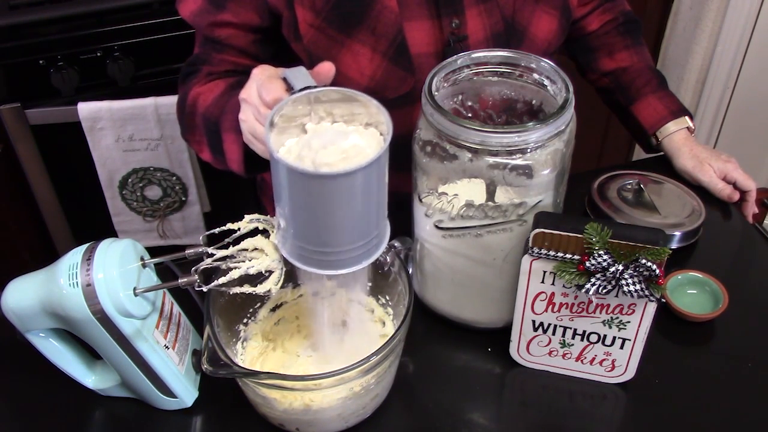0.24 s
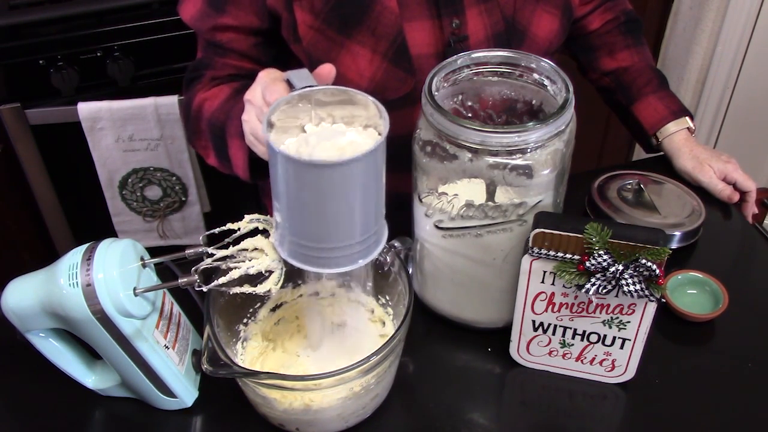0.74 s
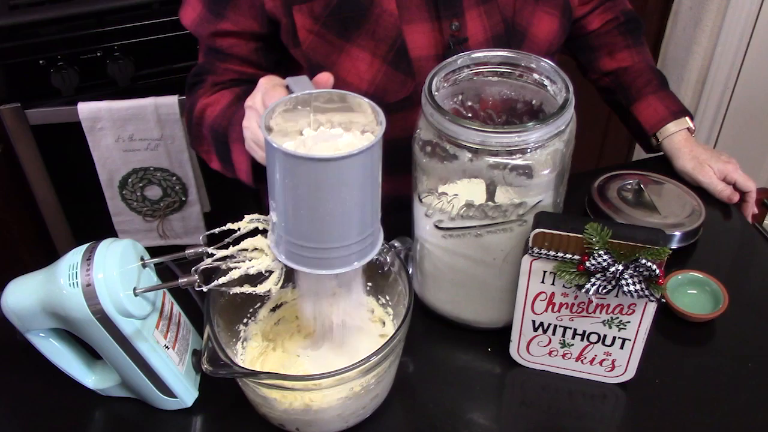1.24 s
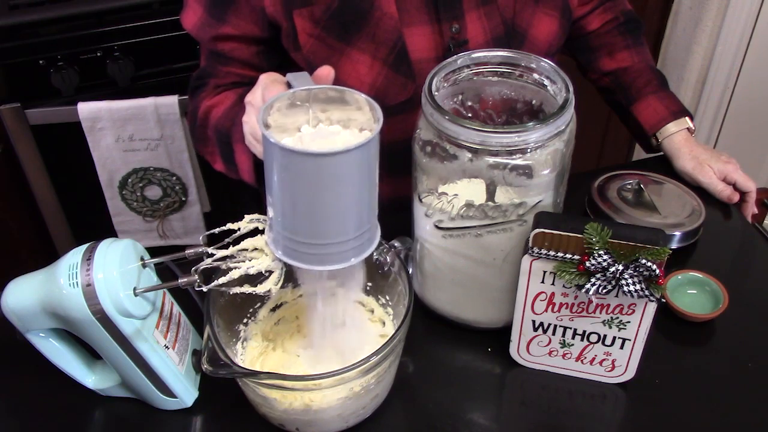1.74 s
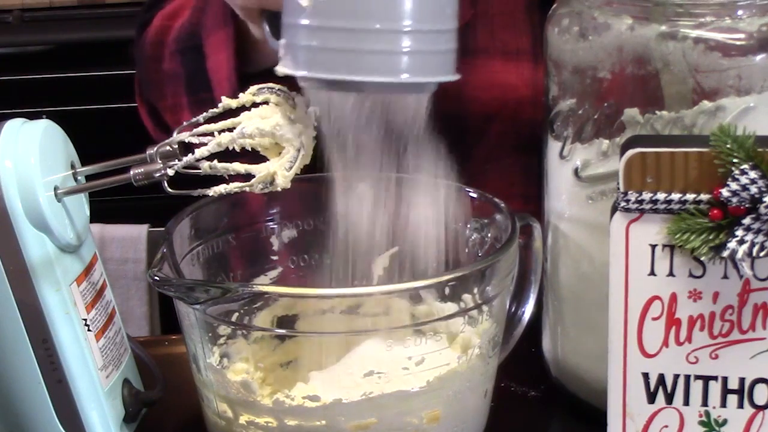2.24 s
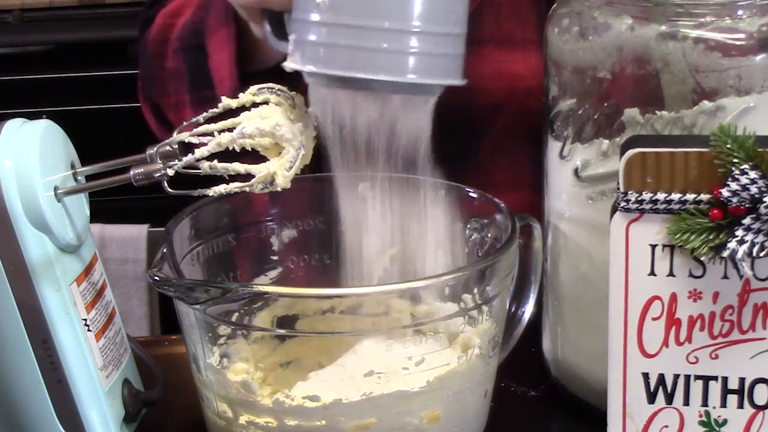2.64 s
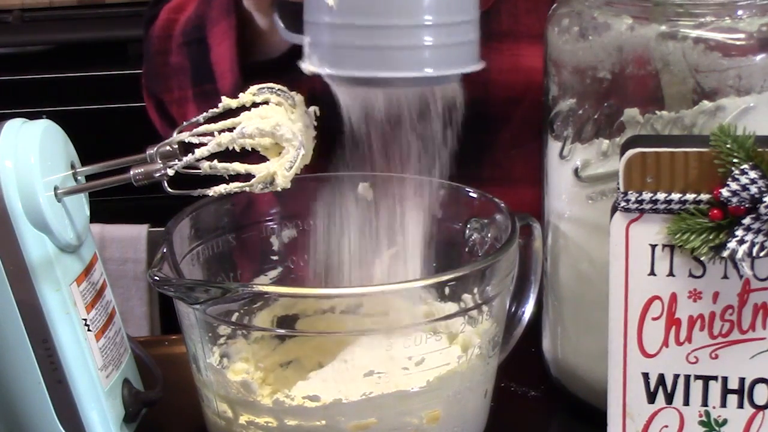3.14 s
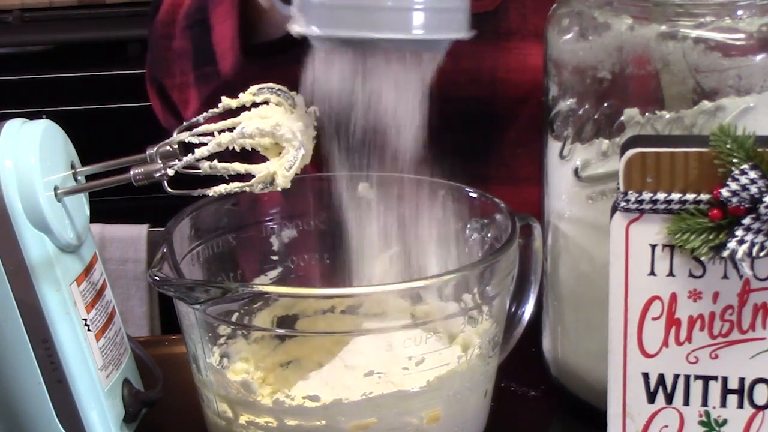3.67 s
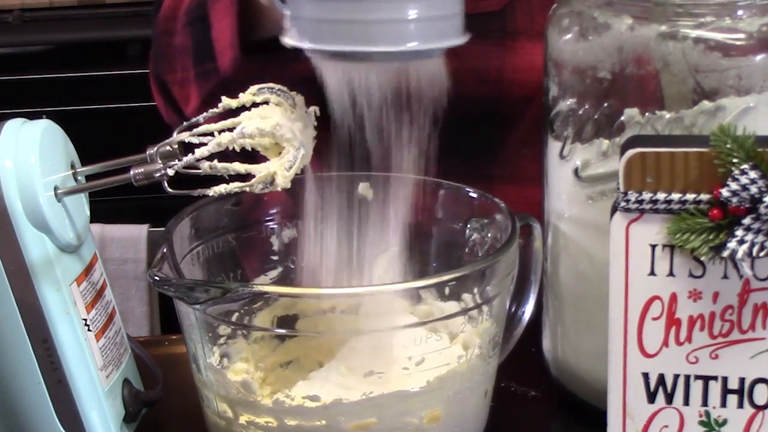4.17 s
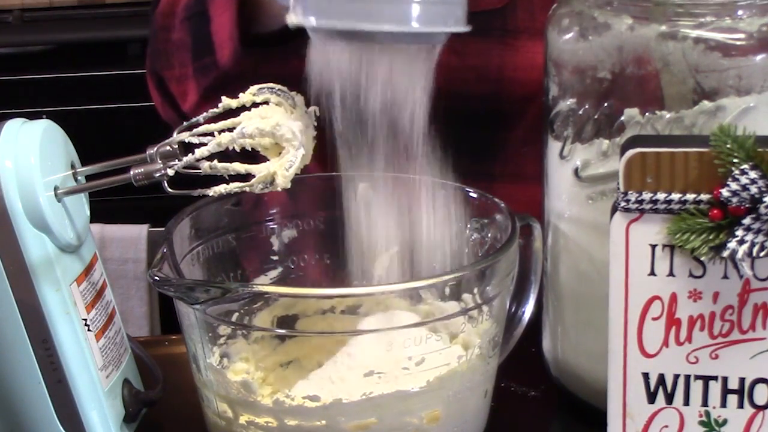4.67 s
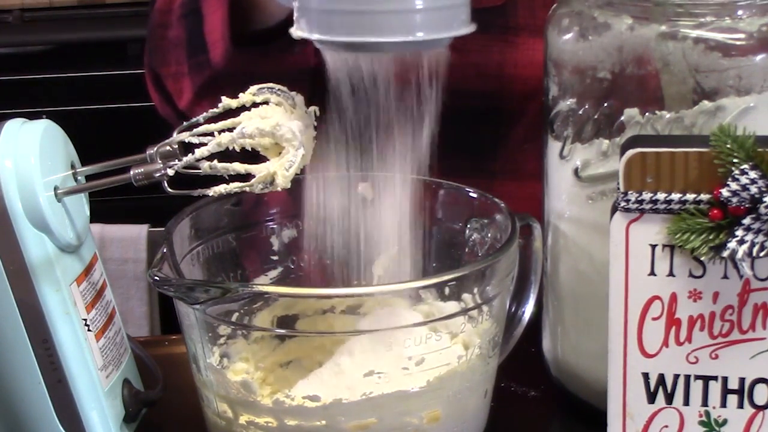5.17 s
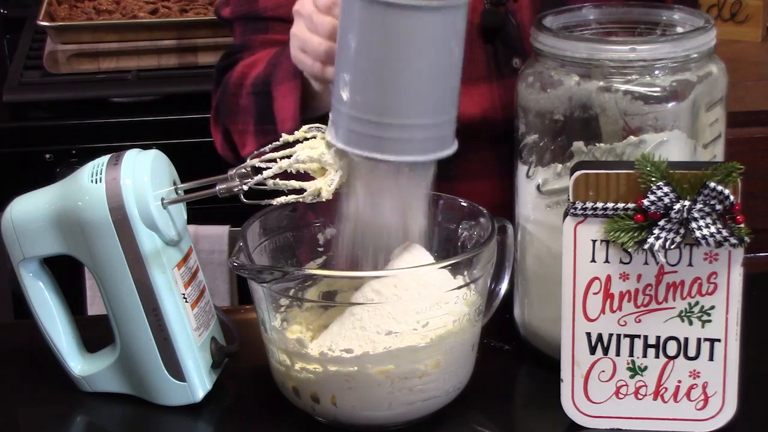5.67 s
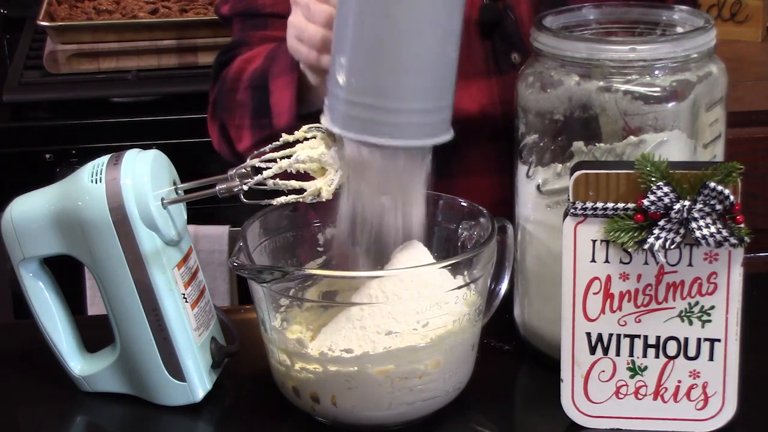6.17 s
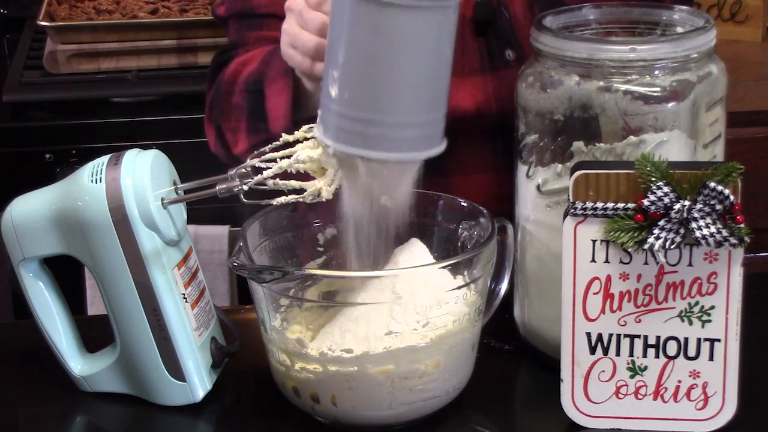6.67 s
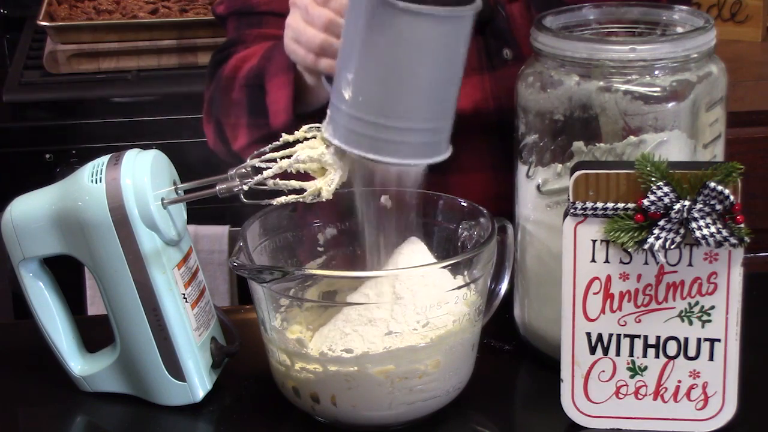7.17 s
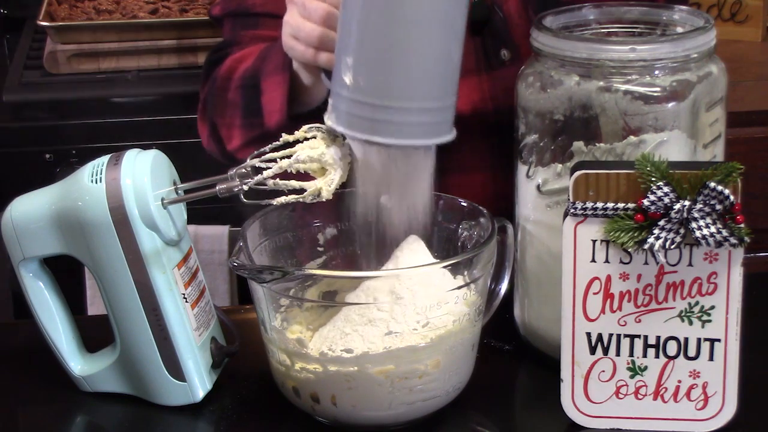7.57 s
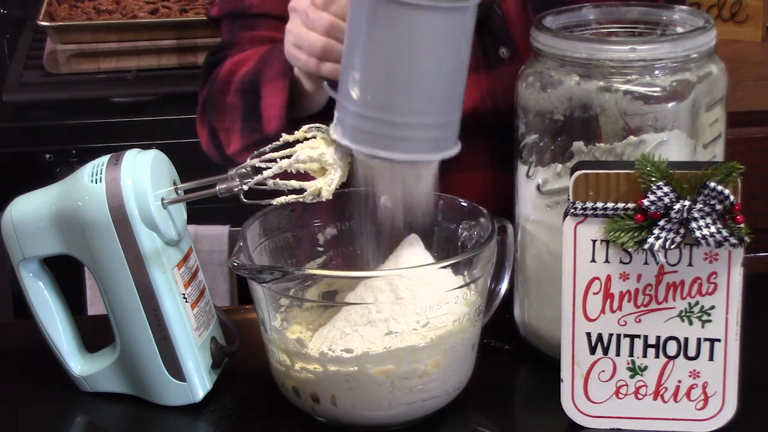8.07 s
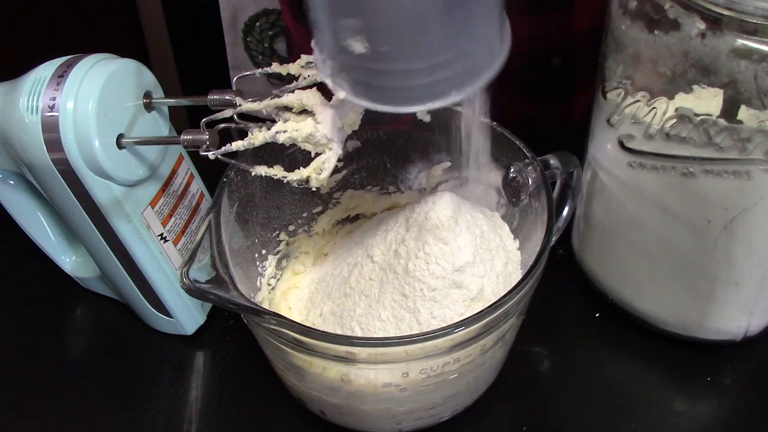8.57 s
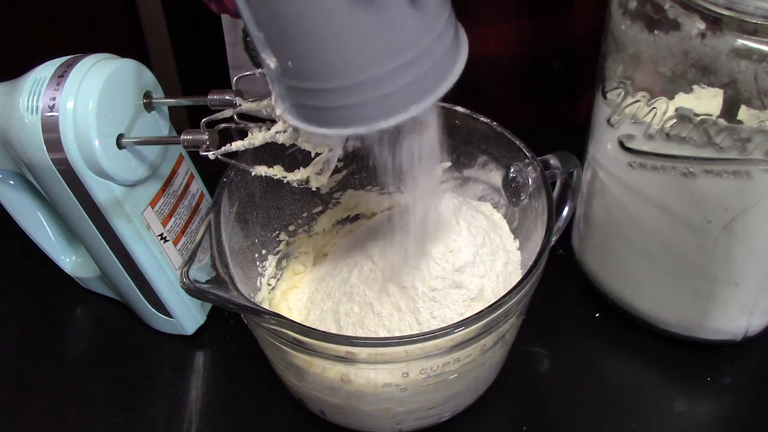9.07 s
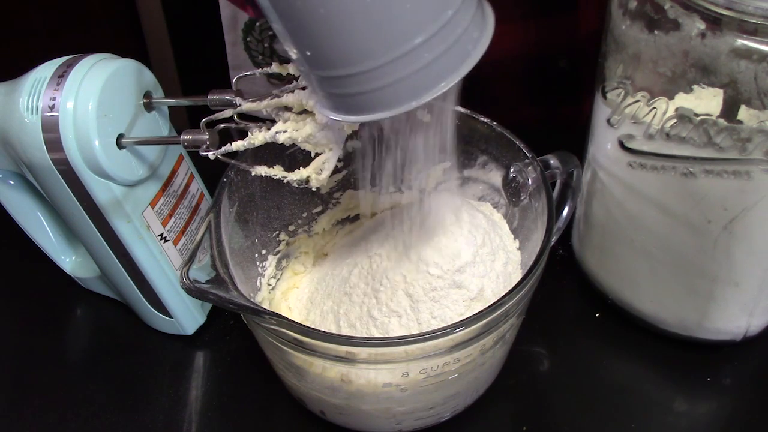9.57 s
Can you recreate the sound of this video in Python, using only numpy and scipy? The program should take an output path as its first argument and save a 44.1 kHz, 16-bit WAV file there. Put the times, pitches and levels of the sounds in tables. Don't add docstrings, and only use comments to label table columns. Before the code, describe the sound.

Quick metallic tick-scrape-snap cycles of a hand flour sifter give way to fast tinny cup slaps, then return crisper, over soft room rumble and hiss.

```python
import sys
import numpy as np
from scipy import signal
from scipy.fft import rfft, irfft
from scipy.io import wavfile

SR = 44100
rng = np.random.default_rng(int(sys.argv[2]) if len(sys.argv) > 2 else 0)


def ratio(d):
    e = np.asarray(d, float) / 20
    return 10 ** e


def store_wav(level_fs):
    pcm = np.round(np.clip(np.atleast_2d(level_fs), -1, 1) * 32767)
    wavfile.write(sys.argv[1], SR, pcm.T.astype(np.int16))


N = 433062

# (f/Hz, level/dB per Hz)
RUMBLE_COLOUR = [(20, 3), (60, 8), (150, 0), (300, -3.5), (500, -3.5), (750, -8.5), (1300, -12),
                 (2500, -22.5)]
HISS_COLOUR = [(200, -4.5), (1500, -5.5), (3600, -7), (8000, -8.5), (12000, -10), (15600, -12),
               (15900, -26)]
# (start t/s, scrape decay t60/s, low ring f/Hz, scrape colour [(f/Hz, level/dB per Hz)])
POSITIONS = [(0, 0.032, 3380, [(88, -48), (150, -7.5), (328, -2.5), (774, -14.5), (1310, -0.5),
             (1630, -12.5), (2500, -12), (2760, -10), (3920, -9), (7920, -10), (12400, -22.5),
             (16000, -49)]), (1.97, 0.023, 2450, [(88, -57), (150, -7), (504, -3), (790, -11), (1260, 0.5),
             (1790, -14), (2140, -16), (2550, -11), (3770, -11.5), (4410, -9), (8400, -13.5),
             (16000, -22)]), (8.6, 0.067, 2480, [(88, -36), (150, -9), (244, -10), (475, -3.5), (649, -10),
             (888, -3.5), (1360, 1), (1660, -11.5), (2920, -2.5), (3550, -3.5), (8230, -2.5),
             (16000, -26)])]
DRAG_LIMITS_S = [2.015, 5.6, 10]

# (t/s, peak level/dB, palm level/dB, finger snap level/dB, rattle delay t/s)
SLAPS = [(5.55, -19, -28, -20, 0.022), (5.722, -23, -17.5, -2, 0.024), (5.888, -21, -25, -4.5, 0.019),
         (6.051, -23.5, -12.5, -5.5, 0.017), (6.227, -15, -10, -9, 0.022), (6.401, -19, -27.5, -4.5, 0.022),
         (6.581, -18.5, -17.5, -7.5, 0.023), (6.756, -24, -14, -3, 0.019), (6.929, -18.5, -21, -12, 0.023),
         (7.11, -32.5, -4, 2, 0.018), (7.284, -24.5, -14, -9.5, 0.018), (7.459, -17, -11, -14.5, 0.018),
         (7.635, -18.5, -11, -12, 0.023), (7.81, -17.5, -9.5, -6, 0.019), (7.986, -18.5, -12, -4, 0.018),
         (8.157, -27.5, -6.5, -4.5, 0.021), (8.332, -16, -45, -11, 0.015), (8.498, -12, -45, -16, 0.013)]
# (f/Hz, level/dB, decay t60/s)
PALM_MODES = [(70, 5, 0.025), (269, -22, 0.11), (337, -9, 0.11), (356.6, 2.5, 0.088), (397.5, 13, 0.074),
              (412, -17, 0.11)]
HAND_MODES = [(436.6, -20.5, 0.22), (507.4, 4, 0.056), (524.6, -8.5, 0.13), (605, -14.5, 0.18),
              (517, -21, 0.44)]
FINGER_MODES = [(974, -8.5, 0.044), (1212, -9.5, 0.063), (1312, 2, 0.022), (1340, -44.5, 0.013),
                (2167, -6.5, 0.08)]
# (f/Hz, level/dB per Hz)
RATTLE_COLOUR = [(410, -17), (700, -10), (814, -6.5), (1380, -2), (1980, -15.5), (2580, -7), (2890, -2),
                 (3400, -14), (4650, -10), (8070, -9.5), (9370, -15.5), (14000, -17.5)]
# (f/Hz, decay t60/s, level/dB)
WALL_RINGS = [(1130, 0.015, -11), (1191, 0.01, -11), (2015, 0.0057, -4), (2450, 0.0081, -6.5),
              (2977, 0.01, -10.5), (3287, 0.011, -9), (4730, 0.062, -24.5)]

# (t/s, peak level/dB)
GRIPS = [(0.032, -24.5), (0.2634, -25), (0.4741, -23), (0.668, -21.5), (0.883, -27.5), (1.0927, -21.5),
         (1.3036, -25.5), (1.509, -26.5), (1.709, -26), (1.904, -24), (2.058, -21), (2.2504, -22),
         (2.4485, -28), (2.6486, -25.5), (2.85, -20.5), (3.0544, -23), (3.249, -22), (3.4536, -25),
         (3.6646, -21.5), (3.872, -25.5), (4.0766, -25.5), (4.2812, -27.5), (4.4724, -22.5),
         (4.6754, -21.5), (4.8881, -22.5), (5.093, -23), (5.301, -28), (5.5107, -22.5)]
# (t/s, peak level/dB, hardness level/dB, level/dB of the drag before it)
STOPS = [(0.0792, -23.5, 5, -47), (0.3084, -28, -2, -46), (0.5197, -28, 2, -48), (0.714, -21.5, 2, -48),
         (0.9227, -17.5, 4, -47), (1.1331, -17, 3, -47), (1.3435, -17, 4.5, -47), (1.5508, -19.5, 2.5, -48),
         (1.751, -19.5, 6, -46.5), (1.945, -49, -3.5, -45.5), (2.0973, -12.5, -11, -47.5),
         (2.2903, -15, -2, -45), (2.4935, -17.5, -5, -46.5), (2.6886, -15, -10, -45),
         (2.8905, -18.5, -8, -43.5), (3.0966, -19, -11, -44), (3.2889, -18, -8, -46.5),
         (3.495, -31, -18, -45.5), (3.704, -22, -6, -46), (3.914, -24.5, -21, -45.5),
         (4.1185, -22, -4, -45.5), (4.3251, -22.5, -8, -49.5), (4.5165, -20.5, -10, -47),
         (4.717, -20, -2, -49), (4.9294, -20.5, -6, -49), (5.1347, -19, -3.5, -46.5),
         (5.3457, -22, -6, -46), (5.5548, -25.5, -6, -48.5)]
# the same columns, then extra low ring level/dB
LATE_STOPS = [
    (8.646, -13, 1, -46, 11.5),
    (8.923, -12.5, -1.5, -53, 3),
    (9.1551, -12, 0, -48.5, -16),
    (9.3773, -14, -2, -51, -12),
    (9.5992, -12.5, -4, -49, -12),
    (9.8111, -13, -2.5, -50.5, 2),
]
# (t/s, peak level/dB, hardness level/dB, level/dB of the drag after it)
RELEASES = [(0.1199, -22.5, -6, -44), (0.3442, -24, 1.5, -46), (0.546, -28, 4, -45), (0.75, -23, 1.5, -44),
            (0.965, -22, -2, -43.5), (1.1742, -24, 0, -43.5), (1.382, -26.5, 1, -44),
            (1.5818, -22.5, -1, -44.5), (1.7806, -19.5, -12, -45), (1.957, -23, -4, -42.5),
            (2.149, -18, -5.5, -42), (2.3369, -20.5, -5, -40), (2.5352, -22, -28, -42.5),
            (2.7289, -21.5, 0, -42.5), (2.9336, -22, -16, -42.5), (3.1307, -21, -19, -42),
            (3.3347, -25.5, -1, -42.5), (3.5403, -26.5, -1.5, -41.5), (3.7516, -25, 1.5, -44.5),
            (3.9499, -22.5, -1.5, -43), (4.1566, -24.5, -1, -43), (4.354, -28.5, 4, -44.5),
            (4.55, -26.5, 1.5, -44), (4.7589, -22, -1.5, -44), (4.9666, -24, 1.5, -45.5),
            (5.1799, -22, -2, -45.5), (5.3825, -25.5, -1.5, -44.5), (5.572, -44, 1, -48)]
LATE_RELEASES = [(8.766, -24, -2, -51), (9.0016, -23.5, -6.5, -45), (9.2342, -24, -5, -47.5),
                 (9.443, -24, -5, -44.5), (9.6635, -24.5, -5, -47)]
# (t/s, peak level/dB, hardness
# level/dB)
STRAYS = [(0.172, -27.5, -19), (0.8032, -32, -23), (1.983, -35, 4), (3.1493, -35, 7), (4.3814, -39.5, -13),
          (5.2061, -35, 5), (8.623, -39.5, -13), (9.0728, -29, -2), (9.0817, -36, -12), (9.7349, -28, -25)]
# (start t/s, end t/s, start level/dB, end level/dB)
FIRST_DRAG = [(8.574, 8.603, -53, -55)]

# (start t/s and end t/s counted from the click, swell level/dB)
SQUEEZE_MOTION = [(-0.0352, 0.0012, -2), (-0.036, 0.0015, 2.5), (-0.033, 0.01, 24)]
RETURN_MOTION = [(.01, .054, -1), (.011, .052, 4), (.011, .065, -15.5)]
# (bright ring f/Hz, low ring level/dB)
GRIP_TONE = [(7830, -8.5), (7950, -6.5), (7900, -7.5)]
STOP_TONE = [(7850, -14), (7700, -12), (7270, -20.5)]
RELEASE_TONE = [(7000, -11.5), (7200, -8.5), (7300, -10)]
STRAY_TONE = [(8100, -6), (7440, -5.5), (7580, -16)]
# trickling flour, cup body in a stop, wire bounce after a release (level/dB)
FLOUR_DB = [-64.5, -66, -58]
STOP_BODY_DB = [-15.5, -11, -9]
BOUNCE_DB = [-29, -12, -19]

RUMBLE_DB, HISS_DB = -56, -53
LEFT_DB, RIGHT_DB = 2.5, -3.5
KITCHEN_DB, KITCHEN_T60_S, BRIGHT_T60_S = -20, 0.47, 0.16
SLAPS_START_S, SLAPS_END_S = 5.59, 8.585
RATTLE_DB, RATTLE_FOLLOWS = -34.5, 0.33
GRIP_HARD_DB, RELEASE_HZ_PER_DB = -26, -78
CLICK_RISE_S, BOUNCE_S = 0.00025, 0.014


def decay(t, t60):
    return ratio(-60 * t / t60)


def colour(x, points):
    hz, level_db = np.transpose(points)
    grid = np.arange(1, 2050) * SR / 4096
    cepstrum = irfft(np.log(ratio(np.interp(np.log(grid), np.log(hz), level_db))))
    cepstrum[1:2048] *= 2
    cepstrum[2049:] = 0
    kernel = irfft(np.exp(rfft(cepstrum)))
    return signal.oaconvolve(x, kernel / np.sqrt(np.sum(kernel ** 2)))[:len(x)]


def band(x, low_hz, high_hz):
    return signal.sosfilt(signal.butter(2, [low_hz, high_hz], "band", fs=SR, output="sos"), x)


def ring(x, hz, t60):
    radius, angle = decay(1 / SR, t60), 2 * np.pi * hz / SR
    return signal.lfilter([0, np.sin(angle)], [1, -2 * radius * np.cos(angle), radius * radius], x)


def add(out, s, piece):
    i = round(s * SR)
    out[i:i + len(piece)] += piece[:N - i]


def position(s):
    return sum(s >= row[0] for row in POSITIONS[1:])


def background():
    shared, *own = [colour(n, RUMBLE_COLOUR) for n in rng.standard_normal((3, N))]
    hiss = [colour(n, HISS_COLOUR) for n in rng.standard_normal((2, N))]
    rumble = shared * ratio([[1.0], [-1.0]]) + 0.32 * np.array(own)
    return ratio(RUMBLE_DB) * rumble + ratio(HISS_DB) * np.array(hiss)


def kitchen(x):
    t = np.arange(SR // 2) / SR
    noise = rng.standard_normal((5, len(t)))
    tails = []
    for k, side_db in enumerate([LEFT_DB, RIGHT_DB]):
        dull = ratio(side_db) * noise[4] + 0.22 * noise[k]
        dull = colour(dull, [(100, -7.0), (1200, -8.0), (4000, -11.5)])
        bright = 1.3 * noise[2 + k]
        tail = dull * decay(t, KITCHEN_T60_S) + bright * decay(t, BRIGHT_T60_S)
        tails.append(signal.oaconvolve(x, 0.036 * tail * np.minimum(t / 0.0021, 1))[:N])
    return np.array(tails)


def placed(x):
    direct = np.array([ratio(LEFT_DB) * x, ratio(RIGHT_DB) * np.roll(x, 1)])
    return direct + ratio(KITCHEN_DB) * kitchen(x)


def grit(per_cycle, spread_db):
    out, edges = 0, 110 * 2 ** np.arange(0, 7.6, 0.5)
    for low_hz, high_hz in zip(edges, edges[1:]):
        sizes_db = spread_db * np.minimum(rng.exponential(1, N), 4)
        sizes = ratio(sizes_db) * rng.choice([-1, 1], N)
        catches = sizes * (rng.random(N) < (per_cycle * low_hz + 250) / SR)
        out = out + band(catches / np.std(catches), low_hz, high_hz)
    return out / np.std(out)


def cup_wall(x):
    out = x + 1e-18
    rings = 0
    for k, (hz, t60, level_db) in enumerate(WALL_RINGS):
        gain = ratio(level_db) * np.sqrt(4 * np.log(1000) / (t60 * SR))
        rings = rings + (-1) ** k * gain * ring(out, hz, t60)
    return out + rings


def slap_boom():
    boom, t = np.zeros(N), np.arange(SR // 2) / SR
    for s, peak_db, palm_db, finger_db, _ in SLAPS:
        # (modes, push level dB, push width s)
        hits = [(PALM_MODES, palm_db + 3.0, 0.0016), (HAND_MODES, 0, 0.0012),
                (FINGER_MODES, finger_db, 0.0004)]
        for modes, hit_db, width in hits:
            push = np.exp(-0.5 * ((t - 2.37 * width) / (0.34 * width)) ** 2)
            for hz, level_db, t60 in modes:
                luck = rng.standard_normal()
                piece = ring(-push / push.sum(), hz * (1 + 0.0086 * luck), t60)
                add(boom, s - 0.001, ratio(peak_db + hit_db + level_db + 3.4 * luck) * piece)
    return boom


def settling_flour():
    slosh, t = np.zeros(N), np.arange(SR // 2) / SR
    for s, peak_db, *_ in SLAPS:
        add(slosh, s, ratio(peak_db - 23) * decay(t, 0.41) * np.minimum(t / 0.004, 1))
    air = band(rng.standard_normal(N), 487, 535.5)
    return slosh * air / np.std(air)


def wire_rattle():
    shake, t = np.zeros(N), np.arange(SR // 2) / SR
    for s, peak_db, _, finger_db, delay in SLAPS:
        jump = ratio(-1.5) * decay(t, 0.074) * np.minimum(t / 0.00065, 1)
        fall = decay(t - delay, 0.082) * np.clip((t - delay) / 0.0056 + 1, 0, 1)
        add(shake, s, ratio(RATTLE_DB + RATTLE_FOLLOWS * (peak_db + finger_db)) * (jump + fall))
    return colour(cup_wall(shake * grit(per_cycle=0.48, spread_db=3.0)), RATTLE_COLOUR)


def slaps():
    return band(slap_boom() + settling_flour(), 153, 9000) + wire_rattle()


def drags(table, motion):
    rows = []
    for s, _, _, drag_db, *_ in table:
        start, end, swell_db = motion[position(s)]
        cut = min(limit for limit in DRAG_LIMITS_S if limit > s)
        rows.append((s + start, min(s + end, cut), drag_db - swell_db / 2, drag_db + swell_db / 2))
    return rows


def squeezes():
    return drags(STOPS + LATE_STOPS, SQUEEZE_MOTION)


def returns():
    return drags(RELEASES + LATE_RELEASES, RETURN_MOTION)


def contacts():
    grips = [(s, peak_db, GRIP_HARD_DB) for s, peak_db in GRIPS]
    # (events, tone, bright ring Hz per dB of hardness, is a stop)
    kinds = [(grips, GRIP_TONE, 0, False), (STOPS + LATE_STOPS, STOP_TONE, 0, True),
             (RELEASES + LATE_RELEASES, RELEASE_TONE, RELEASE_HZ_PER_DB, False),
             (STRAYS, STRAY_TONE, 0, False)]
    rows = []
    for table, tone, slope, stop in kinds:
        for s, peak_db, hard_db, *more in table:
            bright_hz, low_db = tone[position(s)]
            extra_low_db = sum(more[1:])
            rows.append((s, peak_db, bright_hz + slope * hard_db, low_db + extra_low_db, hard_db, stop))
    return rows


def clicks():
    out, t = np.zeros(N), np.arange(SR // 25) / SR
    homing = [(end, end_db + 5.5, 8000, -14, -20, False)
              for (_, end, _, end_db) in returns()]
    bounces = [(s + BOUNCE_S, peak_db + BOUNCE_DB[position(s)], 7200, -12, -3, False)
               for s, peak_db, *_ in RELEASES + LATE_RELEASES]
    burst = np.minimum(t / CLICK_RISE_S, 1) * decay(np.maximum(t - 0.0012, 0), 0.0069)
    burst = burst * (1 + 1.18 * decay(t, 0.0032))
    for s, peak_db, bright_hz, low_db, hard_db, stop in contacts() + homing + bounces:
        k = position(s)
        layers = [(bright_hz, 0.2 if stop else 0.12, 0),   # (Hz, relative width, dB)
                  (POSITIONS[k][2], 0.13, low_db - 0.5),
                  (11400, 0.14, hard_db - 1.5),
                  (1300, 0.2, STOP_BODY_DB[k] if stop else -26),
                  (4700, 0.25, max(low_db, hard_db) - 8.5)]
        for hz, width, level_db in layers:
            chatter = rng.standard_normal(len(t)) * burst
            piece = band(chatter, hz / (1 + width), hz * (1 + width))
            add(out, s - 0.0002, ratio(peak_db + level_db - 1.5) * piece / np.abs(piece).max())
    return out


def scrape():
    drag, t = np.zeros((3, N)), np.arange(SR // 4) / SR
    for start, end, start_db, end_db in squeezes() + returns() + FIRST_DRAG:
        k = position(end)
        level_db = np.interp(t, [0, end - start], [start_db, end_db])
        coast = decay(np.maximum(t - (end - start), 0), POSITIONS[k][1])
        add(drag[k], start, ratio(level_db - 3.5) * coast * np.minimum(t / 0.002, 1))
    for s, peak_db, *_, stop in contacts():
        add(drag[position(s)], s, ratio(peak_db - (23 if stop else 29)) * decay(t, 0.046))
    starts = [round(row[0] * SR) for row in POSITIONS]
    ends = [starts[1], round(SLAPS_START_S * SR), N]
    for k in range(3):
        drag[k, starts[k]:ends[k]] += ratio(FLOUR_DB[k])
    catches = grit(per_cycle=0.18, spread_db=2.5)
    return sum(colour(cup_wall(catches * drag[k]), POSITIONS[k][3]) for k in range(3))


def scene():
    t = np.arange(N) / SR
    fade = np.clip(np.minimum(t - SLAPS_START_S, SLAPS_END_S - t) / 0.019 + 0.5, 0, 1)
    return background() + fade * placed(slaps()) + placed(scrape() + clicks())


def band_limit(x):
    return signal.sosfilt(signal.butter(12, 16800, fs=SR, output="sos"), x)


def record(dry):
    cut = signal.cheby2(12, 70, 17000, fs=SR, output="sos")
    return band_limit(signal.sosfilt(cut, dry))


dry = scene()
out = record(dry)
store_wav(out)
```